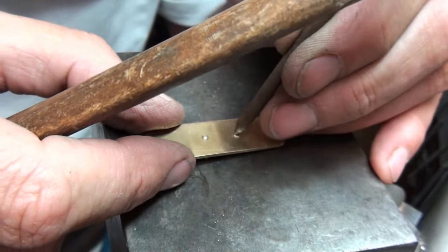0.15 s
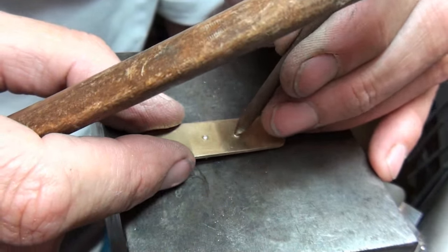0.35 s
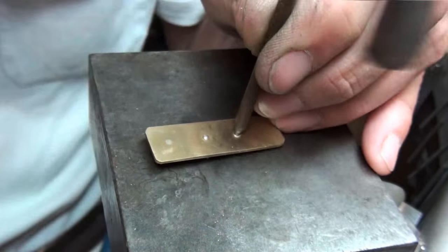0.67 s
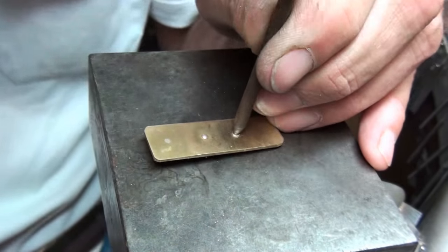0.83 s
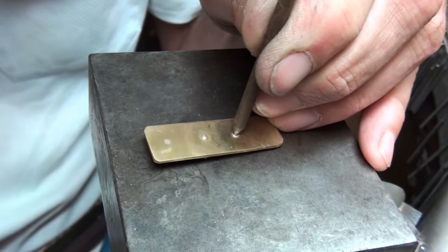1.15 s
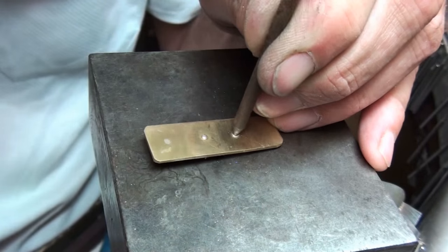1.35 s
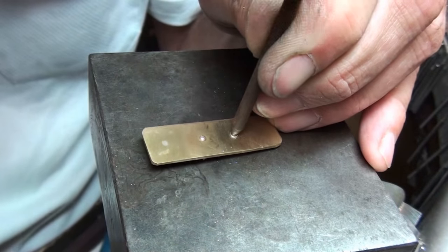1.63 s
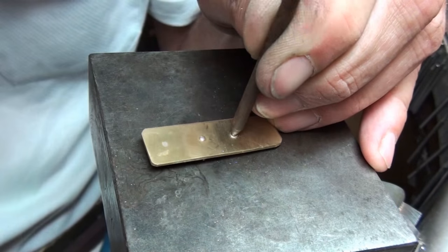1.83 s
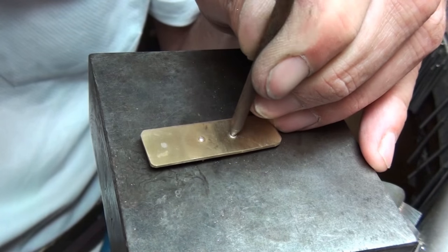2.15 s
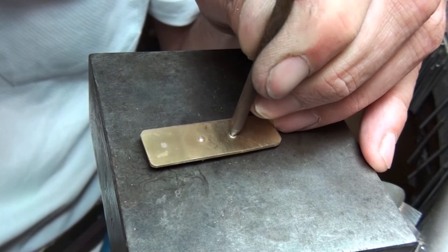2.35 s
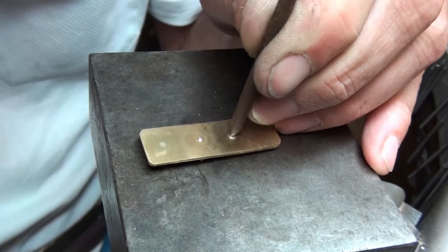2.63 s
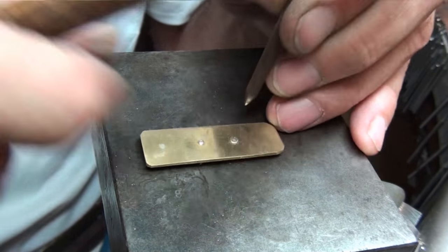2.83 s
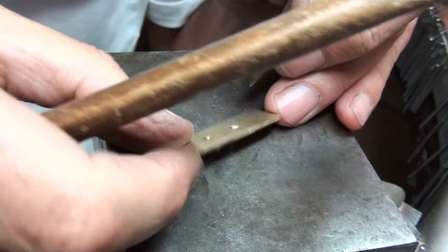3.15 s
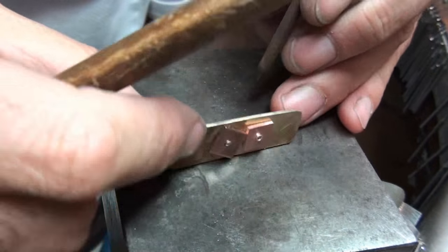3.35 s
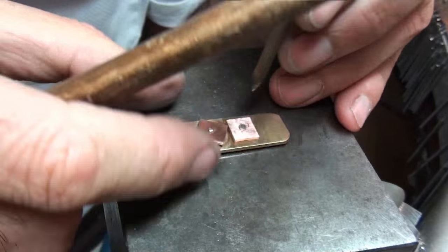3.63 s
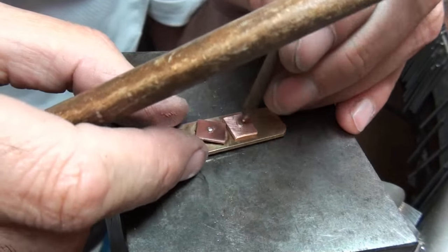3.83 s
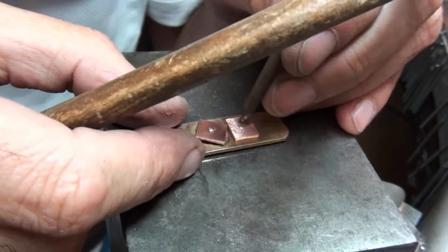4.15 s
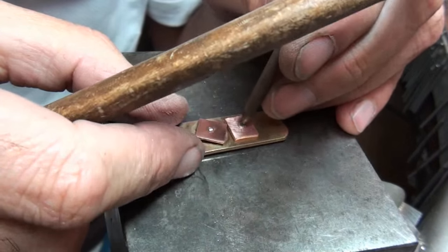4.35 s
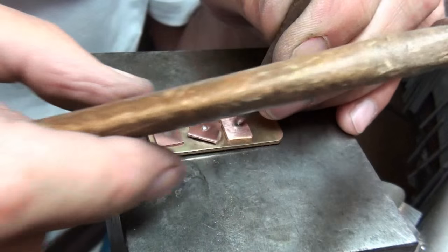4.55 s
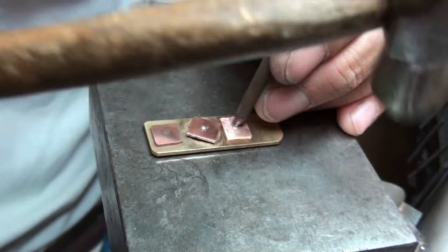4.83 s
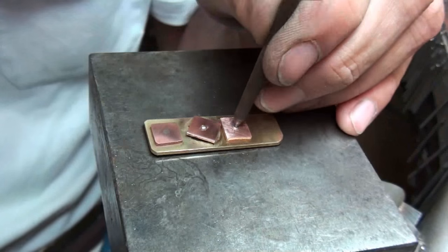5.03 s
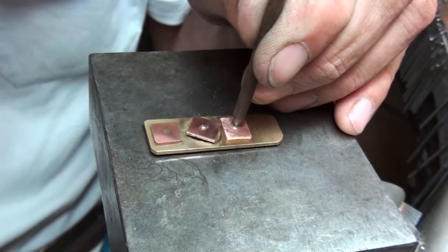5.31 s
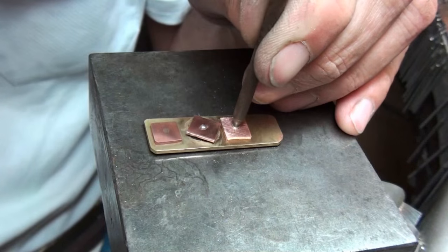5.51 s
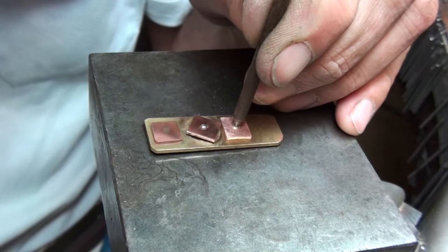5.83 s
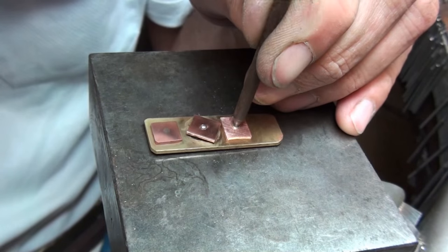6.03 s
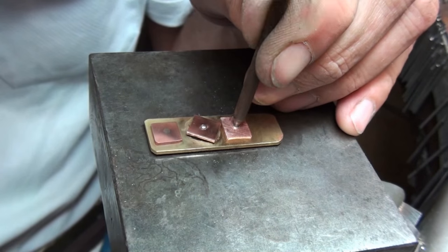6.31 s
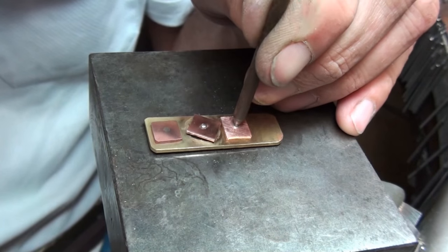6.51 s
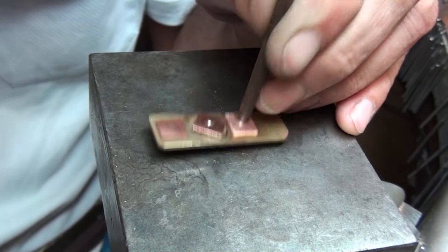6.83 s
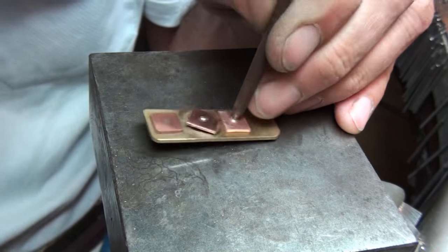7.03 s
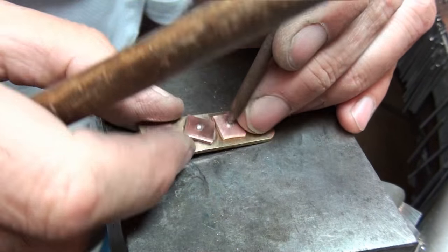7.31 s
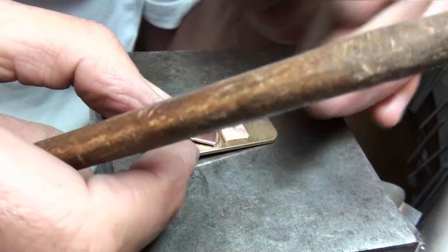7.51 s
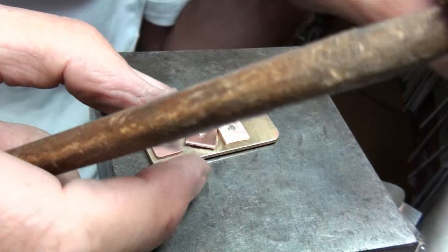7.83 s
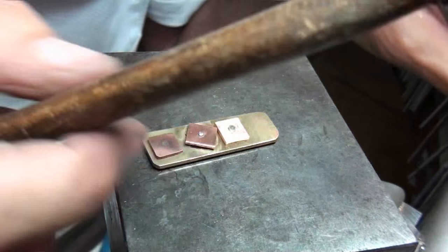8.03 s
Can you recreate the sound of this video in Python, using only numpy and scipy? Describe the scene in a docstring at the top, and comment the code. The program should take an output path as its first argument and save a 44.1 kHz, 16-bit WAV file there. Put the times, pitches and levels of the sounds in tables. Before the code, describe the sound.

A small hammer taps a steel punch in two quick, sharp, ringing runs on a steel block, with bright metal clicks between over faint motor hum.

```python
"""Riveting with hammer and punch

A small hammer taps a steel punch in two runs to flare rivets in a brass plate lying on a steel block.
Taps and rebounds are broadband cracks with beating tool rings; bench and block answer in noise and modes.
Between the runs the plate is turned over and slid about: bright clicks, short pings and gritty friction.
Behind it lie steady air noise and a motor hum built from wavering harmonics."""
import sys
import numpy as np
from scipy import signal
from scipy.fft import rfft, irfft
from scipy.io import wavfile
from scipy.ndimage import map_coordinates

SR = 44100
rng = np.random.default_rng(int(sys.argv[2]) if len(sys.argv) > 2 else 0)


def put_to_file(sound):
    """Save the sound as 16-bit audio at rate SR, in the file named by the first command-line argument."""
    columns = np.atleast_2d(sound).T  # one column per channel
    safe = np.clip(columns, -1, 1)
    whole_steps = np.round(safe * 32767)
    wavfile.write(sys.argv[1], SR, whole_steps.astype(np.int16))


N = 359856
TIME = np.arange(N) / SR  # s
RING_S = .7  # room given to each single sound
AGE = np.arange(int(RING_S * SR)) / SR  # s since a sound began
LAG_S = .0007  # every sound starts this much after its given time
PUNCH_HZ, HAMMER_HZ = 11755, 15245  # nominal rings of the two tools

# Hammer taps. Each row: start in seconds, bench level in dB, punch ring in dB, hammer ring in dB,
# flight to the first rebound in seconds, number of rebounds.
TAPS = [(1.256, -27, -45, -33, .0106, 1), (1.429, -26.5, -10.5, -38, .0141, 1),
        (1.5967, -25, -6, -27, 0.018, 1), (1.7619, -24, -7, -25, 0.017, 1), (1.933, -27, -7, -22.5, 0, 0),
        (2.0911, -27.5, -24, -39, 0, 0), (2.2709, -24.5, -9, -36, 0.017, 2),
        (2.4283, -21.5, -13.5, -26, .016, 1), (5.5146, -34.5, -36, -38, 0, 0),
        (5.7386, -28.5, -21, -37, 0.022, 1), (5.911, -30, -9.5, -31, .022, 1),
        (6.0802, -27, -6, -28.5, .014, 2), (6.2562, -25, -13, -21, .021, 1),
        (6.409, -24.5, -16, -25.5, .0142, 3), (6.5904, -22, -23, -19, 0.02, 2)]
# Colour of the bench boards. Each row: frequency in Hz, relative level in dB.
BENCH_COLOUR = [(150, -23), (480, -2.5), (740, -4), (1000, 1.5), (1300, -0.5), (1600, -3.5), (2050, -5),
                (2800, -13), (3800, -16), (5200, -25.5), (9000, -56)]
# Colour of the bench's low thud. Each row: frequency in Hz, relative level in dB.
THUD_COLOUR = [(35, -17), (60, -15), (76, -0.5), (130, -3.5), (165, -4), (290, -7.5), (480, -2),
               (800, -15.5), (1500, -31)]
# Colour of hammer on punch. Each row: frequency in Hz, relative level in dB.
CRACK_COLOUR = [(200, -30), (600, -21.5), (1000, -4), (2000, -10.5), (3200, -11), (5000, -16.5),
                (7500, -6.5), (9500, -2.5), (11700, 3.5), (13000, -2.5), (15500, -13), (17000, -34)]


def from_db(db):
    """Decibels to gain."""
    return 10 ** (np.asarray(db) / 20)


def rms_one(x):
    """Scale to unit rms."""
    return x / np.sqrt(np.mean(x ** 2) + 1e-20)


def at_hz(points, hz):
    """Read a table on a log-frequency axis."""
    known_hz, values = np.transpose(points)
    return np.interp(np.log(np.maximum(hz, 1)), np.log(known_hz), values)


def add(out, s, sound):
    """Mix in a sound made at time s, starting after a short fixed lag."""
    start = max(round((s + LAG_S) * SR), 0)
    out[:, start:start + sound.shape[-1]] += sound[..., :N - start]


def fade(t60, rise_s=1e-5):
    """Envelope that builds up, then dies by 60 dB in t60 seconds."""
    return from_db(-60 * AGE / t60) * (1 - np.exp(-AGE / rise_s))


def noise(spectrum, size, width=1):
    """Coloured stereo noise at unit rms, its left-right likeness set by frequency."""
    # Each row: frequency in Hz, left-right likeness (1 is identical).
    likeness = [(50, 0.83), (150, 0.83), (400, 0.49), (800, 0.38), (1400, 0.41), (3000, 0.46), (6000, 0.49),
                (12000, 0.73)]
    hz = np.fft.rfftfreq(size, 1 / SR)
    alike = np.clip(at_hz(likeness, hz), -1, 1)
    mid, side = rfft(rng.standard_normal((2, size)))
    mid = np.sqrt(1 + alike) * mid
    side = width * np.sqrt(1 - alike) * side
    pair = mid + side * [[1], [-1]]
    return rms_one(irfft(pair * from_db(at_hz(spectrum, hz)), size))


def drift(rate, size):
    """Smooth random wandering with a spread near 1, steered by rate knots per second."""
    knots = rng.standard_normal(int(size / SR * rate) + 4)
    coarse = np.arange(0, size + 16, 16)
    curve = map_coordinates(knots, [coarse / SR * rate + 1], order=2)
    return np.interp(np.arange(size), coarse, curve)


def modes(table, vary_db, detune):
    """Dying sines whose strength and tuning can change a little with every grip."""
    hz, db, t60 = np.transpose(table)[:, :, None]
    strength, tuning, phase = rng.standard_normal((3, len(table), 1))
    tone = np.sin(2 * np.pi * (hz * (1 + detune * tuning) * AGE + phase))
    return np.sum(from_db(db + vary_db * strength) * fade(t60) * tone, axis=0)


def snap(spectrum, size=2048):
    """The sharpest causal pulse that has this spectrum (minimum phase); unit energy."""
    hz = np.fft.rfftfreq(size, 1 / SR)
    cepstrum = irfft(np.log(from_db(at_hz(spectrum, hz))))
    # folding the cepstrum forward in time packs the energy at the start
    cepstrum[1:size // 2] *= 2
    cepstrum[size // 2 + 1:] = 0
    pulse = irfft(np.exp(rfft(cepstrum)))
    return pulse / np.linalg.norm(pulse)


def crack(spectrum, snap_db, t60, scatter_db, scatter_t60, width):
    """A hard contact: a snap, a burst of dense short modes, then scatter."""
    size = 2048
    scatter = from_db(scatter_db) * fade(scatter_t60, rise_s=.002)
    envelope = (fade(t60, rise_s=.0001) + scatter)[:size]
    burst = noise(spectrum, size=size, width=width) * envelope
    both = burst * np.sqrt(2) / np.linalg.norm(burst) + from_db(snap_db) * snap(spectrum)
    # the energy of one millisecond at unit rms
    return both / np.linalg.norm(both) * np.sqrt(2 * SR / 1000)


def steel_ring(hz, t60, room_db, room_t60, spread_hz):
    """One tone of a struck tool; its reflections beat against each other as they die."""
    phase = 2 * np.pi * (hz * (1 + 0.00106 * rng.standard_normal()) * AGE + rng.random())

    def reflections():
        """The tone with wandering strength and phase."""
        in_phase = drift(spread_hz, len(AGE)) * np.sin(phase)
        return in_phase + drift(spread_hz, len(AGE)) * np.cos(phase)

    room = reflections() + .5 * reflections() * np.array([[1], [-1]])
    direct = fade(t60, rise_s=0.00064) * np.sin(phase)
    return direct + from_db(room_db) * fade(room_t60, rise_s=.004) * room


def motor_hum(count=12):
    """Harmonics of the running speed, each wavering in level and phase."""
    motor_hz, hum_db, fall_db = 95.8, -55, 1.35  # pitch; fundamental level; fall per harmonic
    even_db, third_db = -2.5, 6.5  # odd harmonics are stronger; the housing lifts the third
    hum = np.zeros((2, N))
    for k in range(1, count + 1):
        db = hum_db - fall_db * (k - 1) + even_db * (k % 2 == 0) + third_db * (k == 3)
        phase = 2 * np.pi * k * motor_hz * TIME + 1.07 * drift(9, N)
        waver = from_db(2.0 * drift(13, N))
        hum += np.sqrt(2) * from_db(db) * waver * np.sin(phase)
    return hum


def workshop():
    """The motor hum over steady, coloured air noise."""
    # Each row: frequency in Hz, relative level in dB.
    air_colour = [(20, -22), (45, -14), (110, -10), (150, -13), (260, -5.5), (340, -14.5), (480, -11.5),
                  (690, -11.5), (820, -16), (950, -13.5), (1350, -19.5), (1550, -14.5), (2100, -20),
                  (2800, -24), (5200, -28.5), (9000, -33.5), (16000, -41)]
    air_db = -46.5
    return motor_hum() + from_db(air_db) * noise(air_colour, N)


def sliding():
    """Gritty friction that swells, catches and dies, with one resonance of the plate standing out."""
    # Fingers and brass rubbing on steel. Each row: middle in seconds, half length in seconds
    # (spread of the bell-shaped swell), level in dB, squeak in Hz.
    slides = [(0.621, .04, -58.5, 9800), (0.693, .011, -48.5, 5970), (2.677, .069, -54.5, 7250),
              (2.925, 0.07, -57, 10300), (3.057, .017, -53, 10100), (3.197, .0058, -25.5, 7400),
              (4.988, .075, -53, 6130), (6.905, 0.065, -53.5, 6800), (7.017, .011, -53, 10000),
              (7.066, .016, -50, 9850), (7.166, .007, -43, 10000), (7.22, .03, -57, 9500),
              (7.698, .009, -39, 7500)]
    # Each row: frequency in Hz, relative level in dB.
    grit_colour = [(2000, -22), (5300, -13), (6100, -8), (7400, -7), (8500, -5.5), (9900, -6), (12200, -10),
                   (13500, -16), (16000, -25.5)]
    stick_slip_db, stick_slip_per_s = 3.5, 55  # a slide catches and lets go
    out, size = np.zeros((2, N)), len(AGE)
    for s, half_s, db, squeak_hz in slides:
        grit = noise(grit_colour, size, width=.6) * from_db(2.5 * drift(400, size))
        squeak = rms_one(signal.lfilter(*signal.iirpeak(squeak_hz, 20, fs=SR), grit))
        swell = np.exp(-.5 * ((AGE - RING_S / 2) / half_s) ** 2)
        pressure = swell * from_db(stick_slip_db * drift(stick_slip_per_s, size))
        add(out, s - RING_S / 2, from_db(db) * (0.8 * grit + 0.55 * squeak) * pressure)
    return out


def block_jump():
    """The block jumping on the bench: a short noise burst with a soft onset, stronger on the right."""
    # Each row: frequency in Hz, relative level in dB.
    jump_colour = [(300, -13), (470, 0), (720, -10.5), (950, 4), (1150, -1), (1400, -1), (1620, -12.5),
                   (1950, 1.5), (2400, -7), (3200, -14), (4000, -16), (5000, -28)]
    jump = noise(jump_colour, len(AGE), width=.75) * fade(t60=.1, rise_s=.003)
    return jump * (1 - np.exp(-AGE / .007)) * from_db([[-.7], [.7]])


def bench_boards(common, t60):
    """The bench rings partly the same way each time; its few strong modes beat into lumps."""
    size = len(AGE)
    boards = .65 * common + .75 * noise(BENCH_COLOUR, size, width=.7)
    lumps = from_db(2.2 * drift(130, size))
    return boards * lumps * fade(t60, rise_s=0.015) * from_db([[-.6], [.6]])


def bench_thud(common, t60):
    """The lowest notes of the bench, slowest to build up."""
    thud = 0.52 * common + 0.72 * noise(THUD_COLOUR, len(AGE), width=0.36)
    return thud * fade(t60, rise_s=0.028)


def bench_body():
    """Single modes of bench and block, swelling softly before they die."""
    # Each row: frequency in Hz, relative level in dB, decay by 60 dB in seconds.
    bench_modes = [(76, -8, .5), (108, -6, .5), (138, -6, .45), (190, -7, .4), (290, -8, .35),
                   (352, -6, .35), (470, -2, .35), (576, -7, .33), (636, -7, .3), (767, -5, .3),
                   (804, -7, .3), (945, 0, .27), (1075, -3, .22), (1250, -6, .25), (1728, -9, .2),
                   (1945, -9, .2), (2262, -10, .2)]
    return modes(bench_modes, vary_db=3, detune=.003) * (1 - np.exp(-AGE / .012))


def sizzle():
    """The room's bright tail after a tap."""
    # Each row: frequency in Hz, relative level in dB.
    room_colour = [(1500, -22.5), (5000, -17), (6500, -8.5), (7800, -3), (9000, -2.5), (10500, 1.5),
                   (11300, 1), (11780, 4), (12250, 0), (12800, -5), (14300, -25), (15400, -14.5),
                   (16300, -29)]
    return noise(room_colour, len(AGE)) * fade(t60=0.35, rise_s=0.0088)


def rebounds():
    """The hammer falls back on the punch after ever shorter flights: (s, level dB, punch ring dB)."""
    first_db, loss_db = -15.5, .8  # first rebound; loss at each further one
    ring_base_db, ring_follows = -15, .4  # ring after a 0 dB tap ring; share of the tap's change
    restitution = 0.56  # each flight lasts this share of the one before
    events = []
    for s, _, punch_db, _, flight_s, count in TAPS:
        for k in range(round(count)):
            land_s = s + flight_s * np.sum(restitution ** np.arange(k + 1))
            ring_db = ring_base_db - loss_db * k + ring_follows * punch_db
            events.append((land_s, first_db - loss_db * k, ring_db))
    return events


def hammering():
    """Taps and their rebounds crack, ring the tools and make the block knock on the bench."""
    # a squarely seated punch rings loudly: it takes energy from the crack and the bench sounds longer
    glancing_db, crack_loss_db = -9.8, 5.5  # crack of a glancing tap; loss per unit of ring amplitude
    full_t60_s, t60_s_per_db = 0.45, .0045  # bench decay at a 0 dB punch ring; change with the ring
    # lying flat the plate passes a tap on to the bench more fully than after it is turned over
    turned_s = 3.2
    flat_db, turned_db = (-5, 10), (-7.3, 8.5)  # bench modes and block jump, relative to the bench level
    out, size = np.zeros((2, N)), len(AGE)
    common_bench = noise(BENCH_COLOUR, size, width=0.76)
    common_thud = noise(THUD_COLOUR, size, width=0.59)
    for s, bench_db, punch_db, hammer_db, *_ in TAPS:
        crack_db = glancing_db - crack_loss_db * from_db(punch_db)
        body_db, jump_db = flat_db if s < turned_s else turned_db
        bench_t60 = max(full_t60_s + t60_s_per_db * punch_db, .1)
        sizzle_db = .5 * (bench_db + crack_db) + .09 * punch_db - 10.3
        strike = crack(CRACK_COLOUR, snap_db=-5.0, t60=0.0077,
                       scatter_db=-17.5, scatter_t60=0.049, width=0.69)
        add(out, s, from_db(crack_db) * strike)
        add(out, s, from_db(bench_db + jump_db) * block_jump())
        add(out, s, from_db(bench_db - 1) * bench_boards(common_bench, bench_t60))
        add(out, s, from_db(bench_db) * bench_thud(common_thud, 0.9 * bench_t60))
        add(out, s, from_db(bench_db + body_db) * bench_body())
        add(out, s, from_db(sizzle_db) * sizzle())
        punch = steel_ring(PUNCH_HZ, t60=0.028, room_db=-23, room_t60=0.4, spread_hz=300)
        add(out, s, from_db(punch_db) * punch)
        whistle = steel_ring(HAMMER_HZ, t60=.2, room_db=-4, room_t60=.27, spread_hz=110)
        add(out, s, from_db(hammer_db) * whistle)
    for s, level_db, ring_db in rebounds():
        touch = crack(CRACK_COLOUR, snap_db=-2, t60=.006, scatter_db=-17, scatter_t60=.03, width=.35)
        add(out, s, from_db(level_db) * touch)
        add(out, s, from_db(level_db - 16.5) * common_bench * fade(t60=0.13, rise_s=0.0023))
        punch = steel_ring(PUNCH_HZ, t60=0.031, room_db=-30, room_t60=0.15, spread_hz=260)
        add(out, s, from_db(ring_db) * punch)
    return out


def rocking(count=3):
    """A firm click sets the plate rocking into weaker touches: (s, level dB, favoured Hz)."""
    # Plate and punch touching the block. Each row: start in seconds, level in dB, favoured treble in Hz.
    clicks = [(2.743, -17, 11100), (2.7581, -19, 10200), (2.773, -14, 11000), (2.78, -13, 11500),
              (2.834, -28, 11000), (2.873, -35, 9900), (2.9913, -39, 10100), (3.1826, -18, 7300),
              (3.2034, -5.5, 9300), (3.4005, -32, 9000), (3.477, -35, 9000), (3.5044, -10.5, 10000),
              (3.5437, -16, 11100), (3.5485, -12, 10800), (3.574, -17, 11100), (3.5814, -18.5, 11000),
              (3.6368, -32, 10000), (3.673, -31, 9600), (3.9933, -29, 9200), (4.229, -22, 7800),
              (4.609, -30.5, 7500), (4.6801, -38, 9000), (7.1398, -19.5, 9700), (7.3421, -23.5, 7500),
              (7.6866, -30, 9200), (7.6917, -16, 9800), (7.7065, -29, 12000)]
    gap_s, gap_spread, loss_db = .025, 0.13, 15.5  # gap, its relative spread, loss per touch
    firm_db = -21  # clicks above this rock
    paces = gap_s * np.exp(gap_spread * rng.standard_normal(len(clicks)))
    touches = []
    for (s, level_db, bright_hz), pace_s in zip(clicks, paces):
        for k in range(count if level_db > firm_db else 1):
            touches.append((s + k * pace_s, level_db - k * loss_db, bright_hz))
    return touches


def plate_ping():
    """The held plate pings briefly at a touch."""
    # Each row: frequency in Hz, relative level in dB, decay by 60 dB in seconds.
    plate_modes = [(5750, -15, .07), (7500, -3, .04), (9500, -2, .04), (10300, -5, .04), (12000, -9, .025)]
    return modes(plate_modes, vary_db=4, detune=.02)


def plate_knocks(out):
    """The plate rocks on the block and knocks in a few short, lower modes."""
    # Each row: start in seconds, level in dB.
    knocks = [(2.774, -42), (3.505, -46), (3.548, -40.5), (3.582, -45.5), (3.638, -45.5)]
    # Each row: frequency in Hz, relative level in dB, decay by 60 dB in seconds.
    knock_modes = [(950, -7, 0.12), (1074, -1, 0.07), (2100, -15, 0.12)]
    for s, db in knocks:
        add(out, s, from_db(db) * modes(knock_modes, vary_db=3.5, detune=0.012))


def free_rings(out):
    """The fingers let the small loose metal ring on in thin, high tones."""
    # Each row: start in seconds, level in dB.
    releases = [(2.78, -55), (3.204, -37.5), (6.081, -41), (6.41, -45), (6.592, -38)]
    # Each row: frequency in Hz, relative level in dB, decay by 60 dB in seconds.
    small_modes = [(7919, -12, .3), (9049, -10, .24), (11410, 0, .6)]
    for s, db in releases:
        add(out, s, from_db(db) * modes(small_modes, vary_db=.5, detune=0))


def handling():
    """Bright clicks with pings and a faint tail, plus knocks and free rings of loose metal."""
    # Each row: frequency in Hz, relative level in dB.
    click_colour = [(300, -23.5), (1050, -25), (2000, -26), (3800, -7), (5400, -14), (6500, -12),
                    (7500, 4.5), (8400, -2), (9800, 4.5), (11100, 0), (12300, 1), (13300, -14), (15400, -5),
                    (17000, -26)]
    # ping of a 0 dB touch; firm contact damps it, so it follows only in part
    ping_base_db, ping_follows = -26, .7
    out = np.zeros((2, N))
    for s, level_db, bright_hz in rocking():
        # the point of contact decides which part of the treble speaks: 5 dB less per octave away
        colour = [(hz, db - 5 * abs(np.log2(hz / bright_hz)) * (hz > 3000)) for hz, db in click_colour]
        touch = crack(colour, snap_db=-2, t60=.006, scatter_db=-19, scatter_t60=.025, width=.45)
        add(out, s, from_db(level_db) * touch)
        add(out, s, from_db(ping_base_db + ping_follows * level_db) * plate_ping())
        tail = noise(colour, len(AGE)) * fade(t60=0.32, rise_s=0.0019)
        add(out, s, from_db(level_db - 30.5) * tail)
    plate_knocks(out)
    free_rings(out)
    return out


def scene():
    """Workshop background, rubbing, hammering and handling, summed as one close stereo picture."""
    return workshop() + sliding() + hammering() + handling()


def record(dry):
    """The highest peaks are rounded and the top is cut."""
    cutoff_hz = 16200
    rounded = 1.076 * np.tanh(dry / 1.112)
    top_cut = signal.ellip(8, .2, 80, cutoff_hz, fs=SR, output="sos")
    return signal.sosfilt(top_cut, rounded)


dry = scene()
out = record(dry)
put_to_file(out)
```